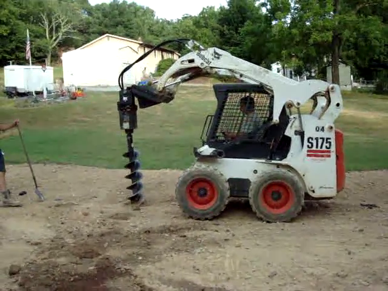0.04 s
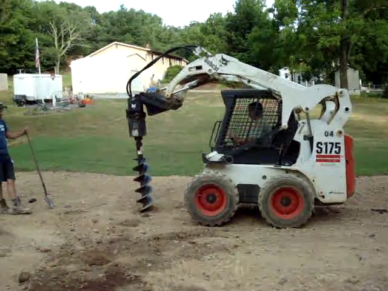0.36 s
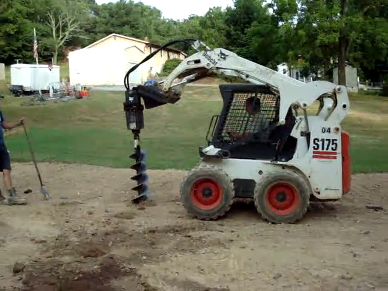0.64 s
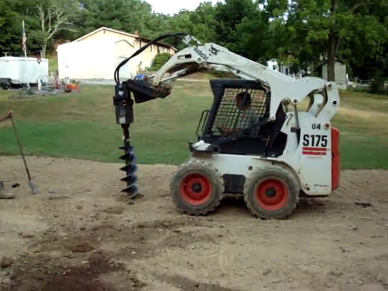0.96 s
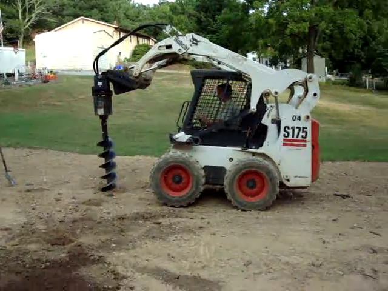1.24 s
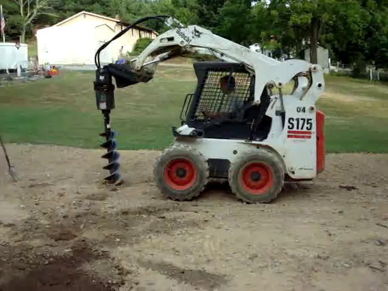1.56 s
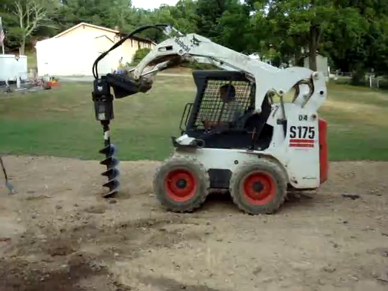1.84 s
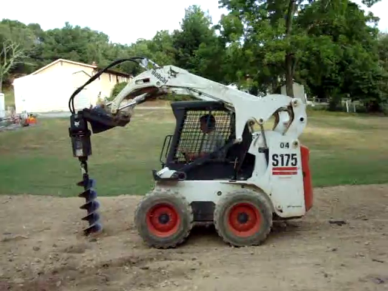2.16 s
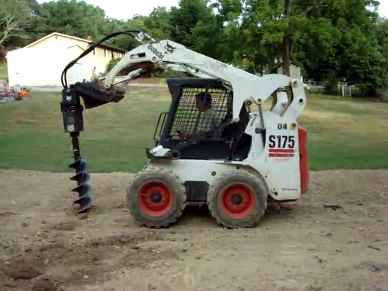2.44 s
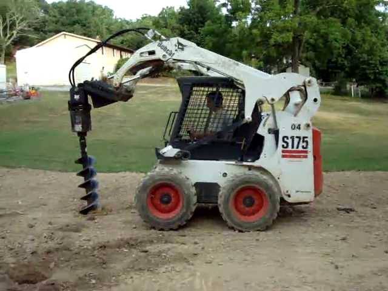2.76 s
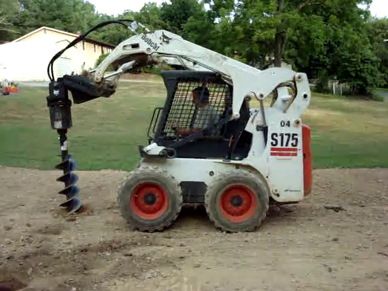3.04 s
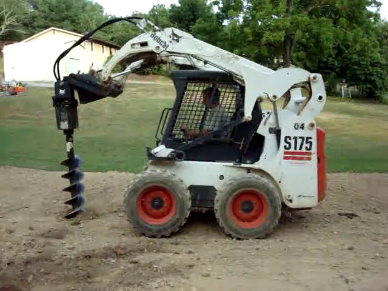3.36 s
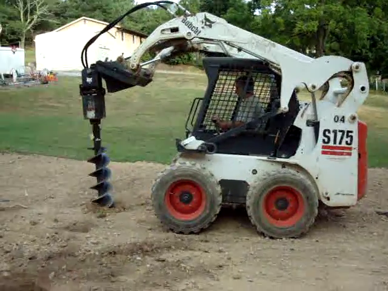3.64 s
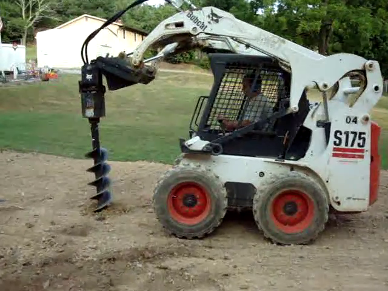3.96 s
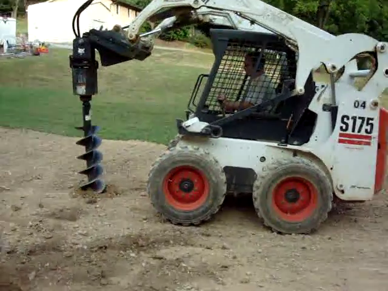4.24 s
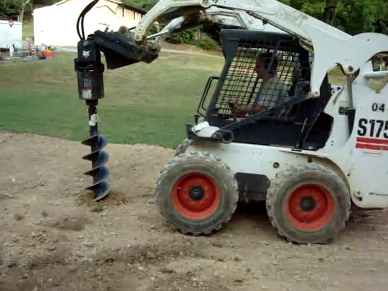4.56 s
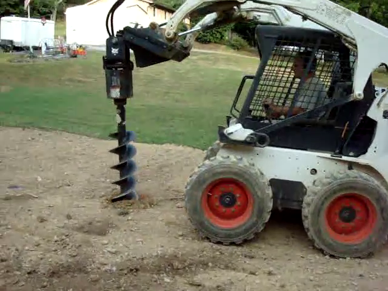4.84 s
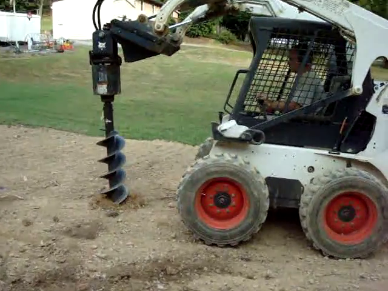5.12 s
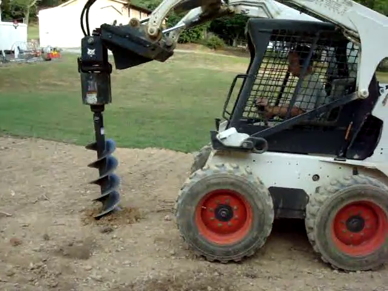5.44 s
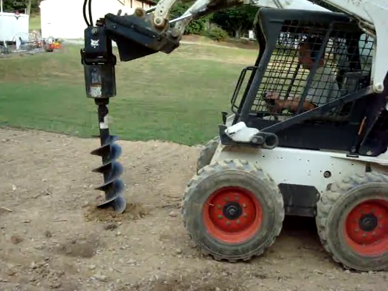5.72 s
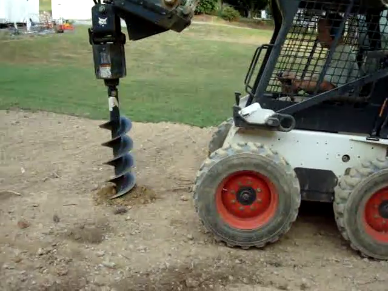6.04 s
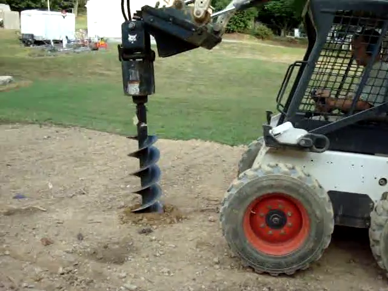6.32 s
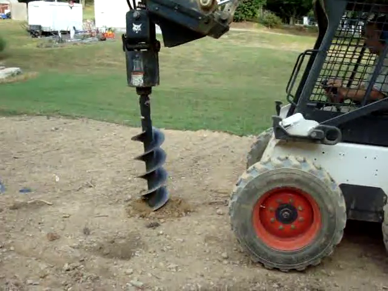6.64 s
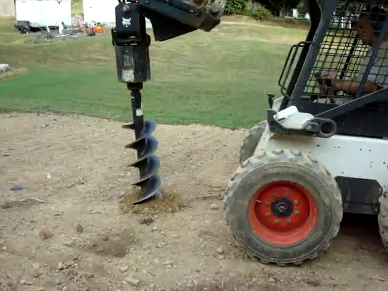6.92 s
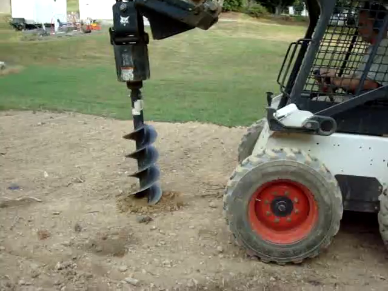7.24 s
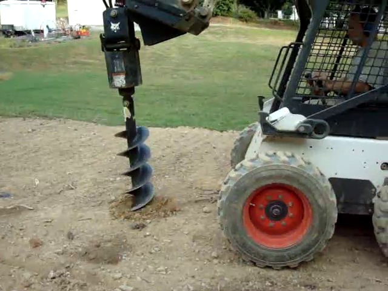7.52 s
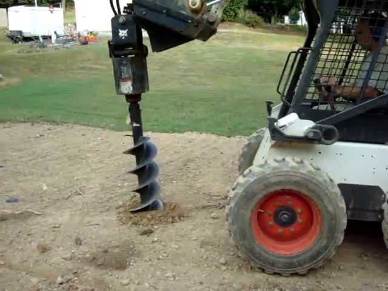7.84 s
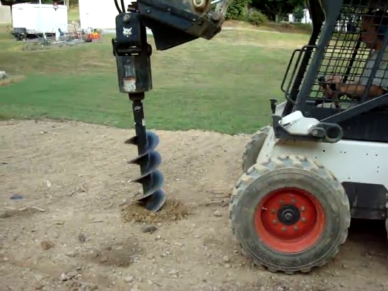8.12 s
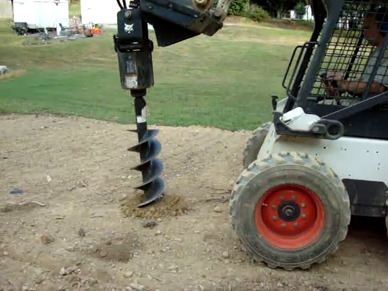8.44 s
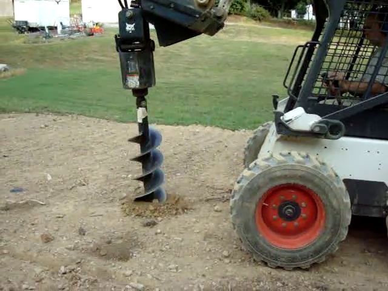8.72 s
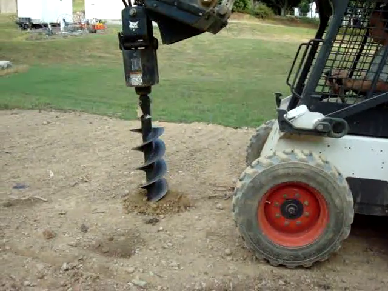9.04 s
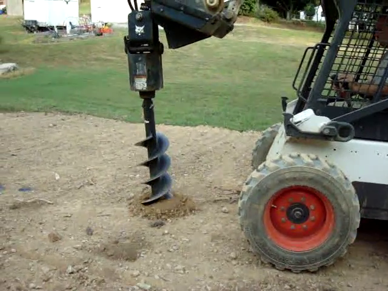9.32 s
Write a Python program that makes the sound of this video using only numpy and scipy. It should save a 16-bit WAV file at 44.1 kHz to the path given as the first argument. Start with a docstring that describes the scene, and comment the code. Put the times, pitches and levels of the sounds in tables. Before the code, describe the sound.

Outdoors, a continuous diesel roar and the whine of a hydraulic pump come from a small loader turning an earth auger. As the microphone approaches the drill, the drone becomes brighter, with more clatter, hissing oil and grit ticking on steel. Several soft, dull knocks sound midway, and light scrapes recur as the auger turns. The revs hold nearly constant throughout.

```python
"""Skid-steer loader drilling dry dirt

Outdoors, a diesel at high revs turns an earth auger. Combustion knocks make a roar and a clatter,
the hydraulic pump whines in a stack of tones, the cooling fan hums, a few dull thuds sound.
The listener walks from the engine to the drill: the exhaust fades, oil hiss and grit grow.
Places on the walk: 0 engine, 1 rear wheel, 2 front wheel, 3 cab, 4 drill."""
import sys
import numpy as np
from scipy import signal
from scipy.fft import rfft, irfft, next_fast_len
from scipy.io import wavfile

SR = 44100
rng = np.random.default_rng(int(sys.argv[2]) if len(sys.argv) > 2 else 0)


def put_to_file(sound):
    """Save the sound as 16-bit audio at rate SR, in the file named by the first command-line argument."""
    columns = np.atleast_2d(sound).T  # one column per channel
    safe = np.clip(columns, -1, 1)
    whole_steps = np.round(safe * 32767)
    wavfile.write(sys.argv[1], SR, whole_steps.astype(np.int16))


N = 422478


def from_db(db):
    """Decibels to gain."""
    return 10 ** (np.asarray(db) / 20)


def unit_rms(x):
    """Scale to unit power."""
    return x / np.sqrt(np.mean(x ** 2) + 1e-20)


def in_time(rows):
    """Rows of (seconds, value) to a per-sample curve."""
    return np.interp(np.arange(N) / SR, *np.transpose(rows))


def at_place(place, levels_db):
    """Glide between per-place levels; the last one holds."""
    return np.interp(place, np.arange(len(levels_db)), levels_db)


def drift(rate_hz, hop=100):
    """Slow random curve, unit RMS."""
    pole = np.exp(-2 * np.pi * rate_hz * hop / SR)
    white = rng.standard_normal(N // hop + 2002)
    slow = signal.lfilter([1], [1, -2 * pole, pole * pole], white)[2000:]
    return np.interp(np.arange(N) / hop, np.arange(len(slow)), unit_rms(slow))


def colour(x, spectrum, skirt_db_per_octave=-40):
    """Filter by rows of (Hz, dB), rolling off above the last."""
    size = next_fast_len(N)
    hz = np.maximum(np.arange(size // 2 + 1) * SR / size, 1)
    points_hz, points_db = np.transpose(spectrum)
    db = np.interp(np.log(hz), np.log(points_hz), points_db)
    db += skirt_db_per_octave * np.log2(np.maximum(hz / points_hz[-1], 1))
    return irfft(rfft(x, size) * from_db(db), size)[:N]


def band_rms(x, low_hz, high_hz):
    """RMS within one band."""
    bandpass = signal.butter(2, [low_hz, high_hz], "band", fs=SR, output="sos")
    return np.std(signal.sosfiltfilt(bandpass, x))


def tone(cycles, level_db, waver_db, rough):
    """Sine with a slow level waver and a fast flutter of phase and amplitude."""
    phase = 2 * np.pi * (cycles + rng.random()) + rough * drift(14)
    amplitude = np.sqrt(2) * from_db(level_db + waver_db * drift(0.94))
    return amplitude * (1 + rough * drift(24)) * np.sin(phase)


def thuds():
    """Dull knocks: short swells of low rumble."""
    # Each row: centre in seconds, level in dB, Gaussian sigma in seconds.
    swells = [(4.68, -27.5, 0.033), (4.99, -22.5, 0.022), (5.032, -25, 0.017), (5.388, -27, 0.017),
              (6.014, -34, 0.034), (6.628, -28, 0.017)]
    # Each row: frequency in Hz, relative rumble level in dB.
    spectrum = [(40, -31), (100, -18), (150, -4.5), (240, -2), (330, 2.5), (600, -13), (2000, -52)]
    t = np.arange(N) / SR
    envelope = sum(from_db(db) * np.exp(-.5 * ((t - at_s) / sigma_s) ** 2) for at_s, db, sigma_s in swells)
    return envelope * unit_rms(colour(rng.standard_normal(N), spectrum))


def auger_scrapes_db(attack_s=0.063, release_s=0.069):
    """The auger scrapes harder about once a turn, less often as it digs in."""
    # Each row: centre in seconds, swell or dip in dB.
    scrapes = [(.1, 2.5), (2.7, 3), (2.93, 5.5), (3.9, 3.5), (4.95, -1.5), (5.42, 1), (5.9, 2.5),
               (6.4, 2.5), (6.98, 2.5), (7.58, 2), (7.9, -0.5), (8.17, 1.5), (8.87, 2), (9.55, -1)]
    t = np.arange(N) / SR
    return sum(db * np.exp(-.5 * ((t - at_s) / np.where(t < at_s, attack_s, release_s)) ** 2)
               for at_s, db in scrapes)


def oil_and_grit(level_db, grit_per_s=500, grit_db=-9, trim_db=-1):
    """Oil rushes through valves, hoses and motor; grit ticks on the steel flights."""
    # Each row: frequency in Hz, relative hiss level in dB.
    spectrum = [(3000, -18), (5500, -6), (6500, 2), (8100, 2), (9000, 0), (10000, -4)]
    tick_chance = grit_per_s * from_db(4 * drift(5)) / SR
    grit = (rng.random(N) < tick_chance) * rng.standard_normal(N)
    hiss = colour(rng.standard_normal(N) + from_db(grit_db) * unit_rms(grit), spectrum)
    return from_db(level_db + trim_db) * unit_rms(hiss)


def exhaust(crank_turns):
    """Four cylinders, two firings a turn; unequal firings add a half order."""
    # Each row: time in seconds, firing tone level in dB.
    firing_levels = [(0.1, -38.5), (1.59, -36.5), (2.59, -41), (3.21, -49), (4.08, -40), (6.3, -49),
                     (8.06, -51), (8.27, -47), (9.5, -49)]
    # Each row: multiple of crank speed, dB relative to the firing tone.
    orders = [(2, 0), (3.5, -16), (4, -7)]
    firing_db = in_time(firing_levels)
    return sum(tone(order * crank_turns, firing_db + db, waver_db=1.0, rough=.05) for order, db in orders)


def fan(crank_turns, near_drill, blades_per_crank_turn=10.63):
    """Cooling fan: blade-pass tone and its octave."""
    passes = blades_per_crank_turn * crank_turns
    level_db = np.interp(near_drill, [0, 1], [-34, -31.5])
    hum = tone(passes, level_db, waver_db=0.5, rough=0.27)
    return hum + tone(2 * passes, level_db - 9, waver_db=6.0, rough=0.14)


def engine_block(crank_turns, place):
    """The block hums at crank orders, each beamed its own way; the cab hides most from the front."""
    # Each row: multiple of crank speed, level in dB at places 0 to 3.
    orders = [(5.5, -43.5, -37.5, -45, -59), (10, -47, -47, -39.5, -36.5), (12, -42, -28.5, -31.5, -47),
              (14, -34, -27.5, -44, -39), (15.5, -26, -29, -38, -39), (16, -39, -34, -35, -42.5),
              (17, -32, -39, -44, -43), (19, -32, -34, -39, -46), (24, -35, -41, -35, -44),
              (26, -42, -32.5, -40, -50)]
    return sum(tone(order * crank_turns, at_place(place, levels_db), waver_db=2.0, rough=0.1)
               for order, *levels_db in orders)


def pump(pump_turns, place):
    """Pistons and gear teeth pulse the oil; each strong tone is beamed its own way."""
    # Each row: multiple of shaft speed, level in dB at places 0 to 4.
    strong_orders = [(7, -31.5, -29.5, -28, -27, -26), (9, -33, -28, -25.5, -35, -36),
                     (11, -26, -25, -22.5, -27, -40), (16, -22, -32.5, -26.5, -21.5, -25.5)]
    # Each row: multiple of shaft speed, level in dB.
    weak_orders = [(2, -55.5), (3, -53), (13, -30), (14, -38), (18, -35.5), (20, -36), (25, -34.5),
                   (26, -35), (40, -41.5), (51, -39.5), (102, -55)]
    strong = sum(tone(order * pump_turns, at_place(place, levels_db), waver_db=.5, rough=.06)
                 for order, *levels_db in strong_orders)
    weak = sum(tone(order * pump_turns, db, waver_db=1.9, rough=0.18) for order, db in weak_orders)
    return strong + weak


def pump_speed_hz(free_hz=56.23, sag_hz=.2, bite_s=4.2, settle_s=1.7):
    """The governor holds the revs; digging pulls them down slightly."""
    digging_s = np.maximum(np.arange(N) / SR - bite_s, 0)
    return free_hz - sag_hz * (1 - np.exp(-digging_s / settle_s))


def panel_resonances(x, place):
    """Panel resonances and reflections, crossfaded from place to place."""
    # One table a place. Each row: centre in Hz, width in Hz, gain in dB.
    engine_peaks = [(1150, 110, 3.5), (1570, 120, -1.5), (1700, 150, 3), (2230, 210, 5.5), (2480, 330, -8),
                    (2920, 150, 5.5), (3130, 160, -6)]
    rear_peaks = [(580, 160, 4), (1050, 170, -4), (1200, 210, 2.5), (1540, 130, -2), (1710, 150, 1.5),
                  (2290, 250, -9), (4250, 280, 1.5)]
    front_peaks = [(462, 91, -4), (556, 86, 7.5), (656, 60, 1.5), (770, 79, -6), (1130, 220, -1),
                   (1496, 120, 4), (1850, 160, 3), (2180, 300, -4.5), (4100, 250, 2)]
    cab_peaks = [(475, 64, -6.5), (937, 100, 6), (1770, 160, -3.5), (2070, 210, 2), (2390, 130, -7),
                 (4250, 900, 4), (5200, 320, 2.5), (6150, 540, -2.5), (7260, 1300, 4)]
    drill_peaks = [(449, 72, -11), (711, 45, 5.5), (983, 100, -5), (1148, 95, 4.5), (1320, 120, -5),
                   (1424, 130, 2), (1796, 104, -8), (2110, 230, 1), (2560, 210, -3.5), (2940, 200, 1.5),
                   (3200, 180, -4), (3590, 170, 4.5)]
    size = next_fast_len(N)
    hz = np.arange(size // 2 + 1) * SR / size
    spectrum, heard = rfft(x, size), 0
    for k, peaks in enumerate((engine_peaks, rear_peaks, front_peaks, cab_peaks, drill_peaks)):
        gain_db = sum(db * .5 ** ((2 * (hz - at_hz) / width_hz) ** 2) for at_hz, width_hz, db in peaks)
        weight = np.maximum(1 - abs(place - k), 0)
        heard += weight * irfft(spectrum * from_db(gain_db), size)[:N]
    return heard


def combustion_knocks(crank_turns, repeat_share):
    """Combustion and valve noise: part repeats every two crank turns, part is new."""
    cycle_samples = int(N * 2 / crank_turns[-1])
    index = (crank_turns / 2 % 1 * cycle_samples).astype(int)
    patterns = rng.standard_normal((2, cycle_samples))
    mix_rad = drift(0.31)   # reflections shift as the listener moves
    repeating = np.cos(mix_rad) * patterns[0][index] + np.sin(mix_rad) * patterns[1][index]
    return np.sqrt(repeat_share) * repeating + np.sqrt(1 - repeat_share) * rng.standard_normal(N)


def engine(crank_turns, pump_turns, near_drill, roar_db, clatter_db, split_hz=1800, roar_trim_db=-1.67):
    """Knocks radiate from the body as low roar and bright clatter, more regular beside the engine."""
    # Body noise at each end of the walk. Each row: frequency in Hz, relative level in dB.
    by_engine = [(30, -42), (70, -41.5), (130, -27), (280, -20), (370, -9.5), (470, -10.5), (620, -7.5),
                 (780, -0.5), (1030, -9.5), (1300, -10.5), (2150, -13.5), (4200, -23), (6000, -32)]
    by_drill = [(30, -42.5), (70, -40), (140, -33), (260, -20), (375, -6), (540, -7.5), (770, -2),
                (1020, -8), (1750, -8.5), (2100, -9.5), (3000, -14.5), (4300, -19), (6000, -29)]
    knocks = combustion_knocks(crank_turns, repeat_share=np.interp(near_drill, [0, 1], [.16, .09]))
    lowpass = signal.butter(4, split_hz, fs=SR, output="sos")
    roar, clatter = 0, 0
    for spectrum, weight in ((by_engine, 1 - near_drill), (by_drill, near_drill)):
        body = colour(knocks, spectrum)
        low = signal.sosfiltfilt(lowpass, body)
        roar += weight * low / band_rms(body, 625, 880)
        clatter += weight * (body - low) / band_rms(body, 1850, 5500)
    shake = 1 + 0.047 * np.cos(2 * np.pi * 2 * pump_turns)   # pump pressure ripple shakes the panels
    return from_db(roar_db + roar_trim_db) * roar + from_db(clatter_db) * clatter * shake


def scene(pump_per_crank=1.1445, soil_spread_db=0.82):
    """The crank drives pump and fan at fixed ratios; scrapes and uneven soil stir clatter and hiss."""
    # Each row: time in seconds, listener's place.
    walk = [(0, 0), (.7, 0.5), (1.6, 1), (2.6, 0.94), (3.7, 2), (4.3, 2.5), (5.1, 3), (5.6, 3.5),
            (6.6, 3.5), (9.58, 4)]
    # Base noise levels in dB at places 0 to 4.
    roar_levels = (-17.5, -18, -17.5, -20, -19)
    clatter_levels = (-23, -23, -23.5, -20.5, -19.5)
    hiss_levels = (-43.5, -43.5, -43.5, -36.5, -34.5)
    place = in_time(walk)
    near_drill = np.interp(place, [1.4, 3.1], [0, 1])
    pump_turns = np.cumsum(pump_speed_hz()) / SR
    crank_turns = pump_turns / pump_per_crank
    scrape_db = auger_scrapes_db()
    soil_db = soil_spread_db * drift(20)
    clatter_db = at_place(place, clatter_levels) + 0.5 * scrape_db + soil_db
    hiss_db = at_place(place, hiss_levels) + scrape_db + soil_db
    noise = engine(crank_turns, pump_turns, near_drill, at_place(place, roar_levels), clatter_db)
    noise += oil_and_grit(hiss_db)
    tones = exhaust(crank_turns) + engine_block(crank_turns, place)
    tones += pump(pump_turns, place) + fan(crank_turns, near_drill)
    return (panel_resonances(noise, place) + tones + thuds())[None]


def record(dry, ceiling=.95, cutoff_hz=10050):
    """Soft clip, then steep low-pass."""
    rounded = dry / (1 + (dry / ceiling) ** 8) ** (1 / 8)
    lowpass = signal.firwin(801, cutoff_hz, fs=SR, window="blackman")
    return signal.fftconvolve(rounded, lowpass[None], mode="same")


dry = scene()
out = record(dry)
put_to_file(out)
```